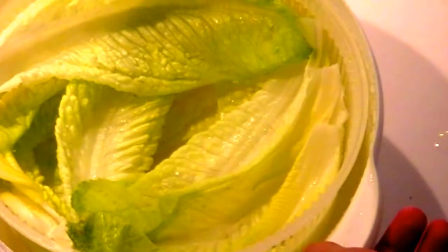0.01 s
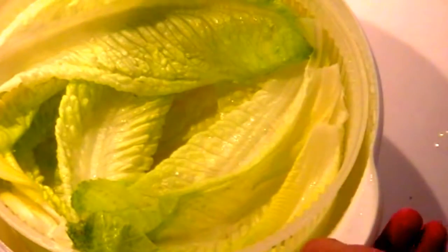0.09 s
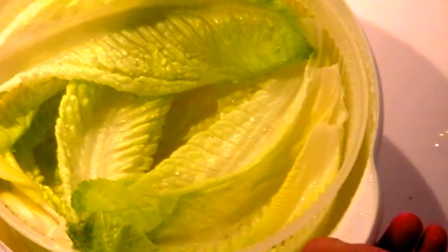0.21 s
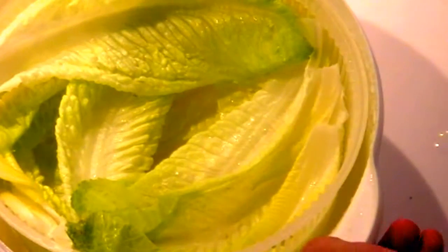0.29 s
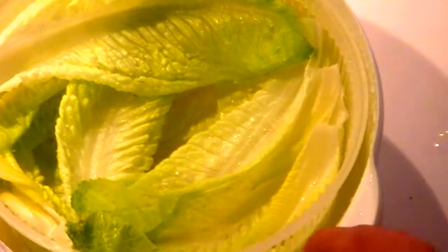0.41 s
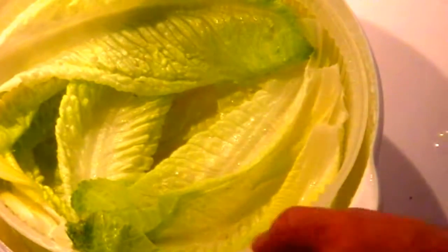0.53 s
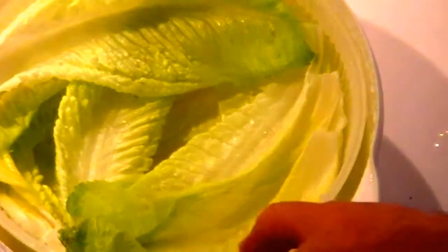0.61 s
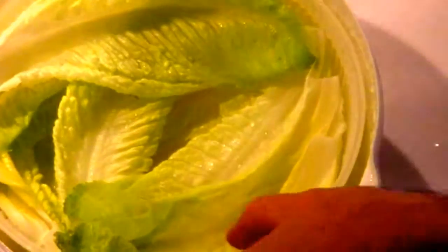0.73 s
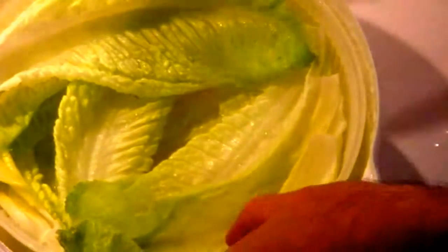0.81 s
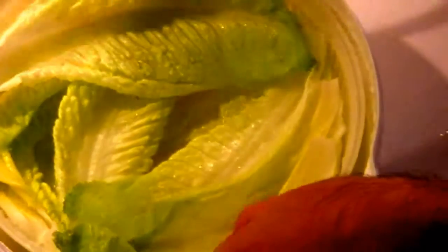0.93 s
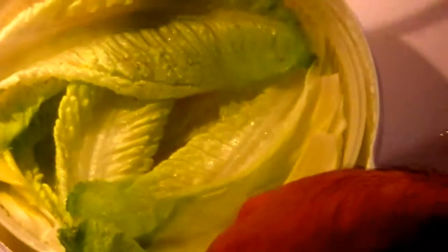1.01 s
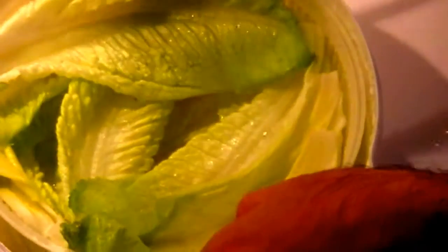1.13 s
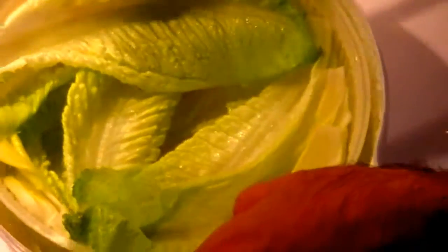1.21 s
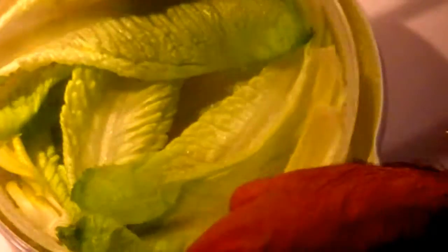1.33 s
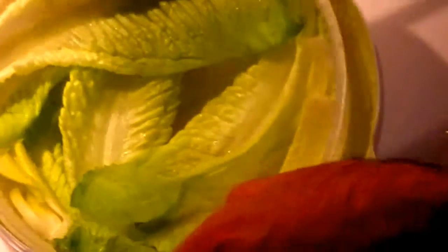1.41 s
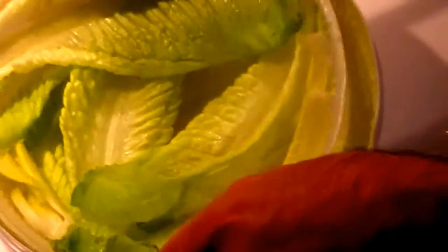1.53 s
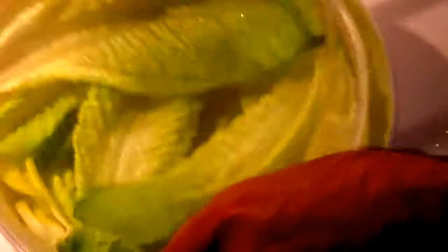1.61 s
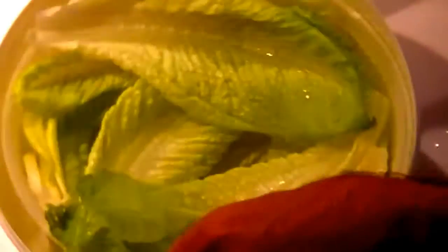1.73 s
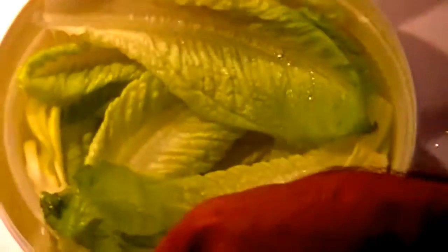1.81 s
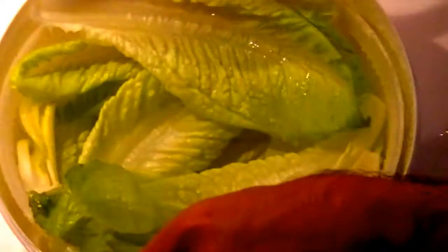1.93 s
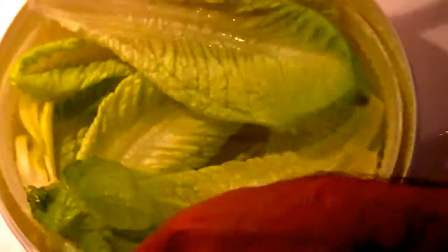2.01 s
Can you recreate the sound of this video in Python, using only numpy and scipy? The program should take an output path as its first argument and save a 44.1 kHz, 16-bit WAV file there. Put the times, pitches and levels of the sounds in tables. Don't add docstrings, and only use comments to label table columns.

```python
import sys
import numpy as np
from scipy import signal
from scipy.fft import rfft, irfft, next_fast_len
from scipy.io import wavfile
from scipy.ndimage import uniform_filter1d

SR = 44100
rng = np.random.default_rng(int(sys.argv[2]) if len(sys.argv) > 2 else 0)


def bounce(signal):
    frames = np.transpose(np.atleast_2d(signal))
    limited = np.clip(frames, -1, 1)
    pcm = np.round(limited * 32767).astype(np.int16)
    wavfile.write(sys.argv[1], SR, pcm)


def gain_from_decibels(decibels):
    exponent = np.asarray(decibels, float) / 20
    return 10 ** exponent


N = 90405


def curve(table, hz):
    table = np.array(table, float)
    return np.interp(np.log(np.maximum(hz, 1)), np.log(table[:, 0]), table[:, 1])


def colour(x, table):
    size = next_fast_len(x.shape[-1] + 4096)
    log_gain = curve(table, np.arange(2049) * SR / 4096) * np.log(10) / 20
    cepstrum = irfft(log_gain)
    cepstrum[1:2048] *= 2
    cepstrum[2049:] = 0
    response = irfft(np.exp(rfft(cepstrum)))
    return irfft(rfft(x, size) * rfft(response, size), size)[..., :x.shape[-1]]


def band(x, hz, width):
    return signal.lfilter(*signal.iirpeak(min(hz, .45 * SR), hz / width, SR), x)


def add(out, s, x):
    i = int(s * SR)
    out[i:i + len(x)] += x[:N - i]


def unit(x):
    return x / np.abs(x).max()


def walk(k):
    return uniform_filter1d(uniform_filter1d(rng.standard_normal(N), k), k) * np.sqrt(1.5 * k)


def hum():
    # frequency in Hz, level in dB per Hz.
    hum_colour = [(25, -33), (150, -22), (310, -7.5), (1000, -5), (1300, -9), (3500, -26.5), (7500, -29),
                  (15000, -42)]
    level_db = -56
    out = 0
    swell = walk(20000)
    for hz in 40 * 2 ** np.arange(0, 8.6, .5):
        noise = band(rng.standard_normal((2, N)), hz, hz / 3)
        out = out + noise * gain_from_decibels(.8 * swell + 1.8 * walk(4000))
    out = colour(out, hum_colour)
    return out * gain_from_decibels(level_db) / out[0].std()


def kitchen(x):
    # frequency in Hz, time in seconds to fall 60 dB.
    decay_times = [(150, 0.22), (400, 0.27), (1000, 0.56), (2500, 0.59), (6000, 0.48), (13000, 0.3)]
    # frequency in Hz, level in dB.
    send_tone = [(200, 6), (370, -2.5), (500, 1.5), (2500, -5), (3800, -6.5), (5600, -5), (7400, -3),
                 (11000, -10.5)]
    level_db, gap_s = -29, 0.0024
    early_db, early_s = 8, 0.0063
    t = np.arange(SR) / SR
    hz = np.arange(SR // 2 + 1.)
    spec, tail = rfft(rng.standard_normal((2, SR))), 0
    for k in range(8):
        centre = 110 * 2. ** k
        octaves_off = np.log2(np.maximum(hz, 1) / centre)
        weight = np.cos(np.pi / 2 * np.clip(octaves_off, -1, 1)) ** 2
        tail = tail + irfft(spec * weight, SR) * gain_from_decibels(-60 * t / curve(decay_times, centre))
    tail = tail * np.clip(t / gap_s - 1, 0, 1) * gain_from_decibels(level_db + early_db * np.exp(-t / early_s))
    spec = rfft(tail)
    power = abs(spec) ** 2
    even = np.sqrt(np.mean(power) / uniform_filter1d(power, size=150))
    response = irfft(spec * even * gain_from_decibels(curve(send_tone, hz)), SR)[:, :SR * 9 // 10]
    return signal.fftconvolve(x[None], response, axes=1)[:, :N]


def rubs():
    # start in seconds, length in seconds, level in dB, centre in Hz.
    brushes = [(1.080, .025, -48, 7500), (1.150, .025, -54, 8500), (1.238, .006, -52, 8000),
               (1.292, .006, -58, 7000), (1.488, .005, -58, 9500), (1.579, .005, -56, 8500),
               (1.619, .032, -45, 7200), (1.629, .035, -45, 1500), (1.652, .016, -38, 5000),
               (1.985, .004, -56, 9500), (2.020, .03, -54, 2200)]
    out, t = np.zeros(N), np.arange(4096) / SR
    for s, length, db, hz in brushes:
        noise = rng.standard_normal((2, len(t)))
        grain = noise[0] * np.exp(0.58 * uniform_filter1d(noise[1], size=40) * 4.5)
        fade_in = t / 0.00069
        fade_out = (length - t) / (0.09 * length) + 1
        shape = np.clip(np.minimum(fade_in, fade_out), 0, 1)
        add(out, s, gain_from_decibels(db) * shape * band(grain, hz, .8 * hz) / grain.std())
    return out


def blows(hits, body, bend_s=0.):
    tick_lead_s, tick_s, tick_hz, tick_width_hz = .002, .0022, 6500, 8000
    scatter_db, grit, first = 4.57, 1.22, 0.63
    thump_db, thump_s = -57, 0.0072
    out, t = np.zeros(N), np.arange(4096) / SR
    thump = unit(t * np.exp(-t / thump_s) * np.cos(t / thump_s * 4))
    for s, db, tick_db, rattle in hits:
        noise = rng.standard_normal((2, len(t)))
        scatter = rng.standard_normal(len(body))
        contacts = np.exp(np.clip(grit * noise[0] / 2, -2, 1) - t / rattle)
        pushes = rng.standard_normal((len(body), len(t))) * contacts
        pushes[:, 0] = first * np.sqrt(rattle * SR) * (-1) ** np.arange(len(body))
        ring = 0
        for (hz, width, gain_db), chance, push in zip(body, scatter, pushes):
            mode = band(band(push, hz, 1.6 * width), hz, 1.6 * width)
            late_s = bend_s * max(np.log2(3000 / hz), 0)
            mode = np.roll(mode, int(SR * late_s))
            ring = ring + gain_from_decibels(gain_db + scatter_db * chance) * mode * np.sqrt(width / np.sum(mode ** 2))
        tick = unit(band(noise[1] * np.exp(-t / tick_s), tick_hz, tick_width_hz))
        add(out, s, gain_from_decibels(db) * unit(ring) + gain_from_decibels(db + thump_db) * thump)
        add(out, s - tick_lead_s, gain_from_decibels(db + tick_db) * tick)
    return out




def counter():
    # frequency in Hz, width in Hz, level in dB.
    counter_modes = [(286, 100, -17.5), (475, 59, -8.5), (768, 155, -10.5), (875, 49.5, 0.5),
                     (1550, 250, -11.5), (2650, 1160, -27), (7400, 3050, -35)]
    # start in seconds, level in dB, tick in dB, rattle in seconds.
    counter_hits = [
        (1.6695, -17.5, -30, 0.0018),
        (1.6795, -17, -19, 0.0021),
    ]
    return blows(counter_hits, counter_modes)


def rim():
    # frequency in Hz, width in Hz, level in dB.
    rim_modes = [(300, 104, -10.5), (584, 280, -16.5), (880, 235, -4.5), (1036, 90, 1), (1350, 1200, -9.5),
                 (1850, 460, -23.5), (2830, 1200, -29.5), (4870, 1600, -22), (7100, 1800, -28.5)]
    # start in seconds, level in dB, tick in dB, rattle in seconds.
    rim_hits = [
        (.6125, -16.5, -6, 0.0081),
        (.8950, -31, -29, 0.016),
        (1.0650, -36.5, -21, 0.0096),
        (1.1250, -32, -28, 0.0026),
        (1.3170, -39, -37, 0.0075),
    ]
    return blows(rim_hits, rim_modes)


def basket():
    # frequency in Hz, width in Hz, level in dB.
    basket_modes = [(240, 69, -12.5), (512, 125, -9.5), (762, 246, 0), (1136, 205, -0.5), (1420, 290, 1),
                    (2070, 480, -9), (2870, 810, -10.5), (4180, 840, -8.5), (5750, 1900, -19),
                    (7340, 2200, -24.5)]
    # start in seconds, level in dB, tick in dB, rattle in seconds.
    basket_hits = [
        (.7440, -15, -9.5, 0.0065),
        (.7600, -20, -28, 0.016),
        (.9460, -22, -7, 0.01),
        (.9620, -19.5, -14, 0.012),
        (1.4280, -31, -33, 0.0033),
        (1.4630, -37, -30, 0.0048),
        (2.0200, -42.5, -30, 0.03),
    ]
    return blows(basket_hits, basket_modes)


def bowl():
    # frequency in Hz, width in Hz, level in dB.
    bowl_modes = [(275, 80, -20), (474, 190, -24), (871, 118, -1.5), (1110, 105, -6.5), (1278, 203, 0),
                  (2066, 260, -2), (2400, 396, -3.5), (3430, 1270, -14.5), (4700, 1000, -18.5),
                  (7470, 480, -15.5), (6300, 3800, -30)]
    # start in seconds, level in dB, tick in dB, rattle in seconds.
    bowl_hits = [
        (.4085, -3, -8, 0.002),
    ]
    return blows(bowl_hits, bowl_modes)


def lid():
    # frequency in Hz, width in Hz, level in dB.
    lid_modes = [(325, 47, -17.5), (717, 270, -21.5), (968, 414, -14), (1433, 317, -13.5), (1784, 163, 1),
                 (2200, 380, -5.5), (2833, 224, -5), (3750, 470, -13.5), (5730, 2800, -31)]
    # start in seconds, level in dB, tick in dB, rattle in seconds.
    lid_hits = [
        (.2288, -3.5, -9.5, 0.0065),
    ]
    return blows(lid_hits, lid_modes)


def latch():
    # frequency in Hz, width in Hz, level in dB.
    latch_modes = [(1105, 236, -9), (2052, 430, -1.5), (2837, 436, -1), (3600, 660, -8),
                   (5250, 1130, -27.5), (7300, 1100, -19.5)]
    # start in seconds, level in dB, tick in dB, rattle in seconds.
    latch_hits = [(.6130, -9, -11.5, 0.00087), (.7415, -11, -10, 0.00027), (.7675, -21, -9, 0.00047),
                  (.8935, -15.5, -11, 0.00073), (.9430, -13, -13, 0.00037), (1.0615, -27, -22, 0.0026),
                  (1.1215, -27, -31, 0.0015), (1.4240, -33, -30, 0.001), (1.4600, -33, -36, 0.00098),
                  (1.6520, -27.5, -5.5, 0.0041), (1.6575, -32, -8, 0.0041), (1.7645, -37, -19, 0.0005),
                  (1.7890, -36.5, -8, 0.00097), (1.9940, -40, -5.5, .001)]
    return blows(latch_hits, latch_modes, bend_s=0.002146)


def scene():
    # frequency in Hz, level in dB.
    mic = [(30, -21), (170, -9.5), (300, -1.5), (8500, -0.5), (10000, -3), (15000, -13), (16200, -30),
           (16500, -65)]
    # frequency in Hz, side level in dB.
    wide_direct = [(100, -9), (500, -27), (3000, -18), (5500, -25), (7800, -4.5), (11000, -21)]
    # frequency in Hz, side level in dB.
    wide_room = [(60, -23), (150, -1), (400, -12), (2500, -12.5), (5000, -11.5), (7800, -5.5), (9500, 0),
                 (12000, -4.5)]
    parts = [(rubs(), 5.5), (counter(), -0.5), (rim(), 5), (basket(), 1.24),
             (bowl(), 2.93), (lid(), 2.7), (latch(), 3.5)]
    dry = colour(sum(x for x, _ in parts), mic)
    sent = colour(sum(x * gain_from_decibels(db) for x, db in parts), mic)
    far = kitchen(sent) + hum()
    mid = dry + far[0]
    side = colour(np.roll(dry, shift=3), wide_direct) + colour(far[1], wide_room)
    return np.array([mid + side, mid - side])


def band_limit(x):
    return signal.sosfilt(signal.butter(12, 16470, fs=SR, output="sos"), x)


def record(dry):
    mix = np.tanh(0.95 * dry) / 0.64
    return band_limit(mix)


dry = scene()
out = record(dry)
bounce(out)
```